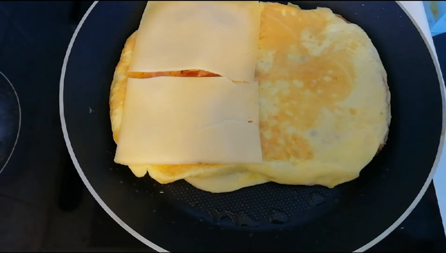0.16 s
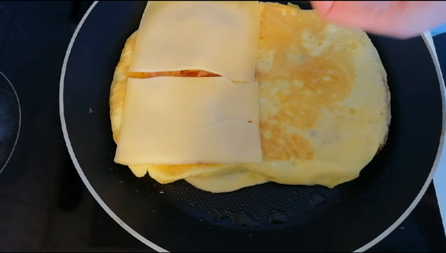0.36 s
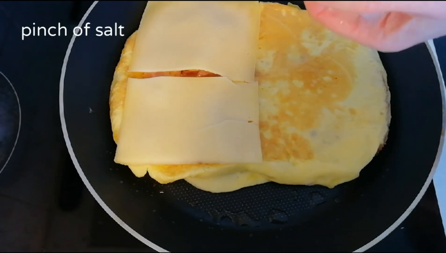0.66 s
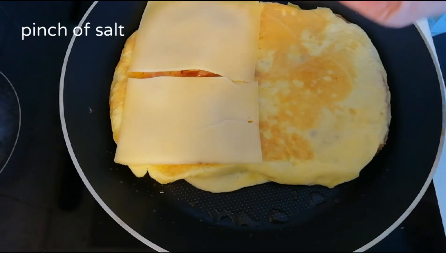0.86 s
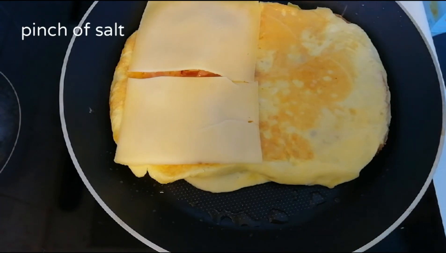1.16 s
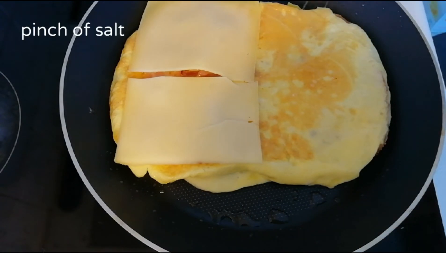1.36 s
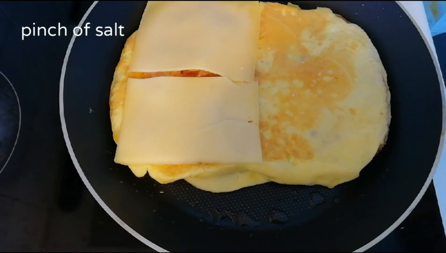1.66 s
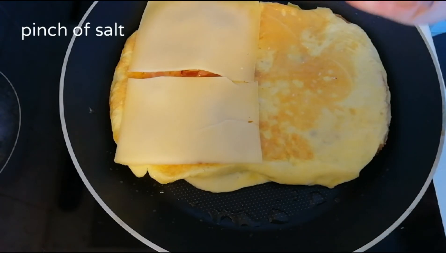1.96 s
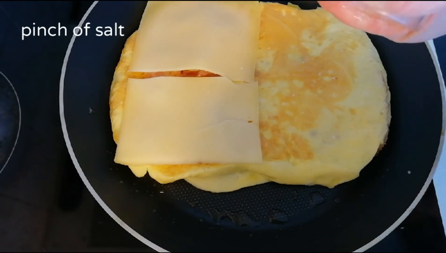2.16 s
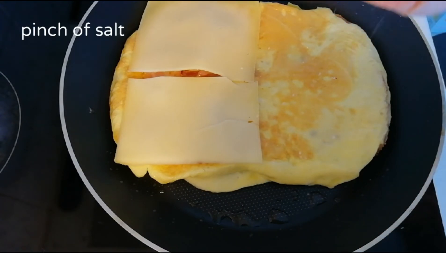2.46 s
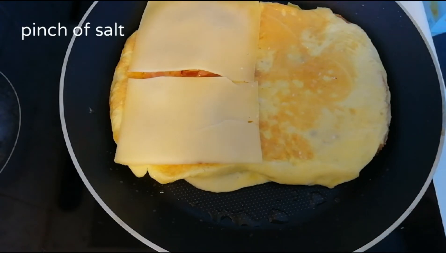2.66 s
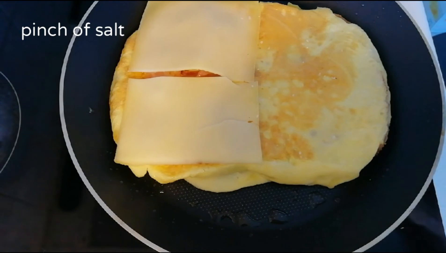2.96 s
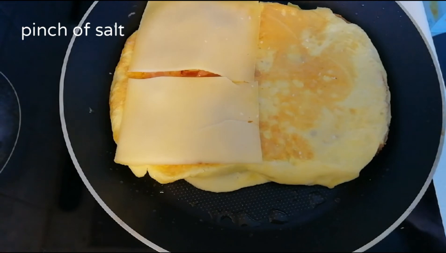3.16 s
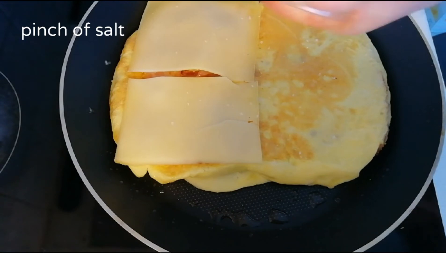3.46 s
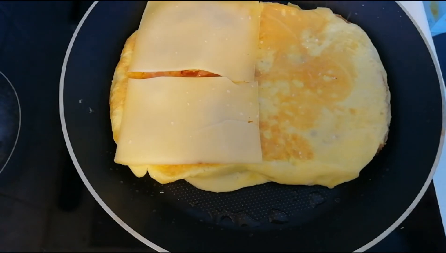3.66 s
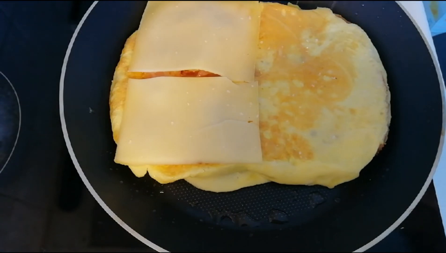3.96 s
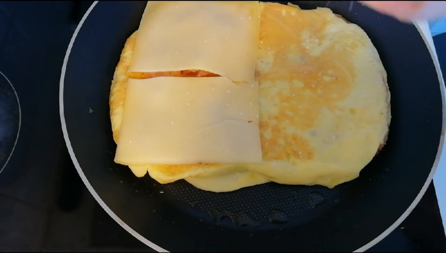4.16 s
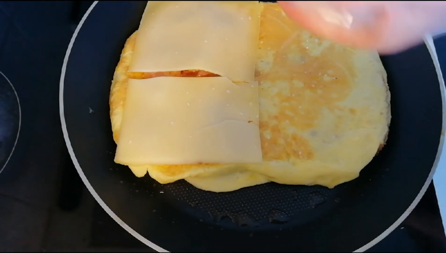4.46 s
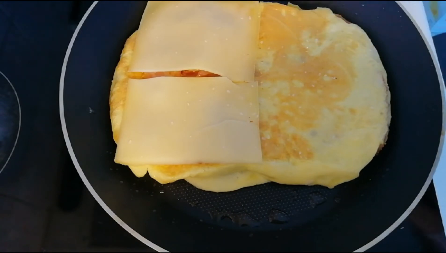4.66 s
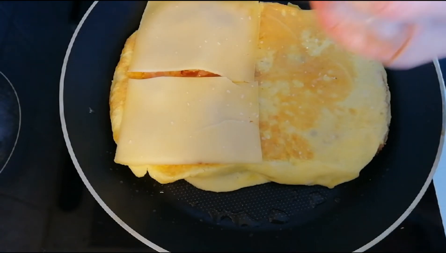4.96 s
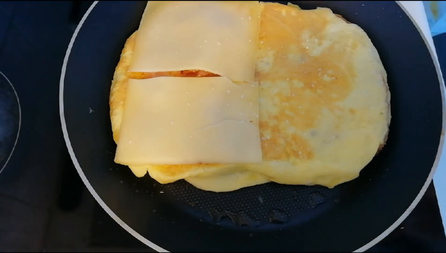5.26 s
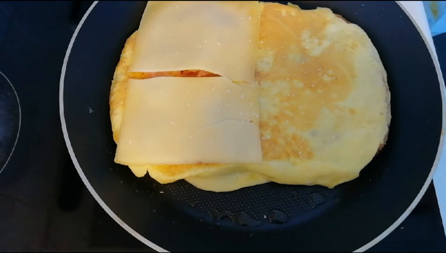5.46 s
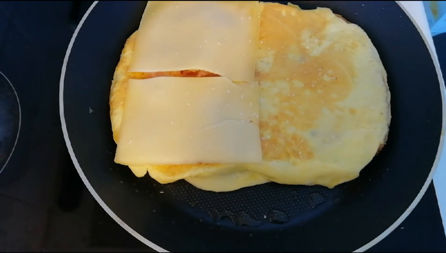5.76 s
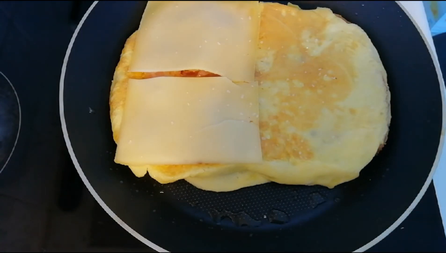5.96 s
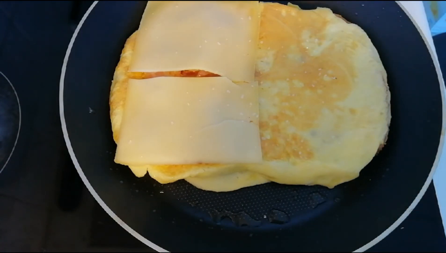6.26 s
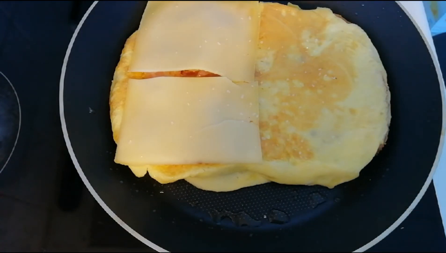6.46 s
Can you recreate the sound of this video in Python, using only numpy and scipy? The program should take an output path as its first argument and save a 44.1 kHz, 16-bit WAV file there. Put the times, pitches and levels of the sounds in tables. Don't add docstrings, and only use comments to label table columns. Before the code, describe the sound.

A salt mill is tilted with a tiny rustle of grains, scrapes softly, then grinds for about four seconds in uneven clusters of sharp, bright crystal cracks with gritty scraping and small hollow knocks. Grinding stops, a few stray ticks follow, and the mill is put down with a dull thud. Very faint sizzle and low hum lie underneath. Close microphone, small kitchen with a short reverberation.

```python
import sys
import numpy as np
from scipy import signal
from scipy.fft import rfft, irfft
from scipy.io import wavfile
from scipy.ndimage import uniform_filter1d

SR = 44100
rng = np.random.default_rng(int(sys.argv[2]) if len(sys.argv) > 2 else 0)


def inscribe(sig):
    pcm = np.round(np.clip(np.atleast_2d(sig).T, -1, 1) * 32767)
    wavfile.write(sys.argv[1], SR, pcm.astype(np.int16))


def boost(x):
    u = np.asarray(x, float) / 20
    return 10 ** u


N = 292150

# start_s, snap_db, upper_burr_db, lower_burr_db
CRACKS = [(0.966, -4, -20, -26), (0.9923, -10.5, -22, -18), (1.0117, -11.5, -13, -17),
          (1.2507, -5, -17.5, -20.5), (1.4059, -24, 2, -15), (1.4186, -10.5, -13, -15.5),
          (1.682, -14.5, -8, -19.5), (1.8123, -8.5, -10, -24), (1.9725, -11.5, -23, -18),
          (1.993, -14, -13, -24.5), (2.0071, -11.5, -21, -21), (2.1235, -7.5, -12.5, -18),
          (2.1835, -11.5, -11, -23), (2.4733, -12.5, -12, -16.5), (2.7474, -5.5, -24, -33),
          (2.7644, -6.5, -22, -16.5), (2.7805, -8, -18, -22), (2.7928, -10.5, -6.5, -16),
          (2.9213, -9.5, -29, -17.5), (3.0563, -12.5, -19, -16), (3.3487, -7.5, -26, -23.5),
          (3.356, -17, -10, -13), (3.5009, -7.5, -15.5, -25), (3.8883, -5.5, -22, -21),
          (4.0529, -5.5, -26.5, -20.5), (4.4447, -7, -13, -16), (4.4727, -17, -3, -21),
          (4.574, -13.5, -11, -21.5), (4.608, -11, -30, -24.5), (4.9436, -4.5, -20, -28.5)]
# start_s, snap_db, upper_burr_db, lower_burr_db
LESSER_CRACKS = [(1.0047, -20.5, -5, -11.5), (1.053, -17.5, -8, -18), (1.3944, -7, -20.5, -28),
                 (1.4246, -15, -1.5, -15.5), (1.4359, -21.5, -9, -16), (1.6521, -22, -10, -10.5),
                 (1.8324, -15.5, -12, -24.5), (1.9615, -16, -19, -23.5), (1.9806, -13, -21, -19.5),
                 (2.1938, -10.5, -18, -20), (2.206, -21, -9, -10.5), (2.4592, -22, -5.5, -9.5),
                 (2.616, -21.5, -9.5, -14.5), (2.6482, -14.5, -11, -17), (3.044, -9.5, -20, -31),
                 (3.0504, -24, -1.5, -32), (3.0838, -21, -15, -13), (3.18, -13, -7, -20.5),
                 (3.3868, -15, -18, -21.5), (3.4705, -24.5, 1, -18), (3.6012, -17, -8, -17),
                 (3.6147, -15, -11, -20), (3.7812, -15.5, -19, -16), (4.0224, -19, -4.5, -15.5),
                 (4.068, -17, -19, -33), (4.1533, -24, -7.5, -16), (4.1958, -19, -18, -22), (4.338, -18, -4, -21),
                 (4.463, -11.5, -15, -13.5), (4.949, -22, -3, -12.5)]
# start_s, snap_db, both_burrs_db
CRUMBS = [(0.9486, -24, -14.5), (0.9823, -16, -9), (1.0645, -21, -6.5), (1.366, -19.5, -27),
          (1.6157, -26, -8.5), (1.7983, -22, -2), (2.0207, -22, -37), (2.1415, -21, -10.5),
          (2.1565, -22, -2.5), (2.1764, -19, -10), (2.632, -21, -11), (2.9111, -17, -22),
          (3.0236, -18.5, -13.5), (3.0689, -16, -18.5), (3.398, -35, -16), (3.488, -15.5, -16),
          (3.6242, -13, -22), (3.7963, -25, -11), (3.9083, -28, -9.5), (3.9908, -35, -12),
          (4.16, -17.5, -13), (4.3233, -29, -8), (4.3457, -18, -13.5), (4.418, -22, -16.5),
          (4.4367, -25.5, -1), (4.589, -25.5, -12), (4.8164, -26, -6.5), (4.8456, -32, -4.5),
          (4.9652, -30, -24), (4.9823, -27, -30)]
# centre_hz, width_hz, level_db
LOWER_BURR = [(1700, 37, -65), (2680, 110, -1)]
# centre_hz, width_hz, level_db
AIR_COLUMN = [(1860, 260, 1), (3720, 180, 0), (5620, 280, 1)]


def evened(x):
    return x / np.sqrt(np.mean(x ** 2) + 1e-20)


def read(points, hz):
    f, value = np.transpose(points)
    return np.interp(np.log(hz + 1), np.log(f + 1), value)


def colour(x, points):
    gain_db = np.maximum(read(points, abs(np.fft.fftfreq(4096, 1 / SR))), -100)
    log_gain = np.log(boost(gain_db))
    taps = np.fft.ifft(np.exp(np.conj(signal.hilbert(log_gain)))).real[:2048]
    return signal.oaconvolve(x, taps)[:len(x)]


def band(x, lo_hz, hi_hz):
    edges_hz = [lo_hz, min(hi_hz, SR / 2 - 100)]
    return signal.sosfilt(signal.butter(2, edges_hz, "bandpass", fs=SR, output="sos"), x)


def ring(x, modes):
    return sum(boost(db) * signal.lfilter(*signal.iirpeak(hz, hz / width, SR), x) for hz, width, db in modes)


def add(mix, s, sound):
    part = mix[round(s * SR):][:len(sound)]
    part += sound[:len(part)]


def grains(per_s, spread_db):
    size = boost(spread_db * np.minimum(rng.exponential(1, N), 5)) * rng.standard_normal(N)
    return evened(size * (rng.random(N) < per_s / SR))


def hum():
    # pitch_hz, level_db
    spectrum = [(12, -8.5), (20, -16.5), (65, 1.5), (144, 1), (188, -15), (242, -15), (275, -6.5),
                (393, -27), (427, -24), (549, -37), (677, -32), (1440, -35.5), (1600, -35), (1700, -36.5),
                (3000, -40.5), (3900, -67), (6600, -120)]
    swell_db = 1.0 * evened(uniform_filter1d(rng.standard_normal(N), 5000))
    shape = boost(read(spectrum, np.fft.rfftfreq(N, 1 / SR)))
    rumble = irfft(rfft(rng.standard_normal(N)) * shape, N)
    return boost(-52 + swell_db) * evened(rumble)


def kitchen(x):
    # pitch_hz, t60_s
    decay = [(300, 0.16), (790, 0.27), (2090, 0.32), (5510, 0.36), (9000, 0.33), (14600, 0.15)]
    out, t = np.zeros(N), np.arange(N) / SR
    for k in range(3):
        taps = np.zeros(SR // 2)
        at = np.arange(80, SR // 2 - 20, 20)
        taps[at + rng.integers(0, 20, len(at))] = rng.choice([-1., 1.], len(at))
        hz, when, z = signal.stft(taps, SR, nperseg=256)
        fading = boost(-60 * when / read(decay, hz)[:, None])
        tail = signal.istft(z * fading, SR, nperseg=256)[1]
        share = np.sqrt(2 / 3) * np.cos(2 * np.pi * (7 * t + k / 3))
        out += signal.oaconvolve(x * share, tail / np.linalg.norm(tail))[:N]
    return out


def sizzle():
    # pitch_hz, level_db
    spectrum = [(1500, -7), (3000, -2), (6000, 0.5), (9000, 2.5), (12000, 4), (16000, 3)]
    swell_db = .7 * evened(uniform_filter1d(rng.standard_normal(N), 4000))
    fizz = grains(5000, 5.8) + boost(2.5) * rng.standard_normal(N)
    return boost(-64.0 + swell_db) * evened(colour(fizz, spectrum))


def set_down():
    # start_s, level_db
    contacts = [
        (6.0894, -19),
        (6.101, -49),
        (6.122, -45),
    ]
    # pitch_hz, level_db, t60_s
    worktop = [(223.3, 0.5, 0.33), (384, -5, 0.45), (490, 9.5, 0.12), (590, -7.5, 1.3), (815, -4, 0.45),
               (938, -5, 0.77), (1124, 0, 0.097), (1360, -28, 0.064), (1700, -22, 1.3), (1840, -27, 0.47),
               (3400, -42, 0.25), (4160, -38, 0.93)]
    # pitch_hz, level_db
    thud = [(100, -13), (250, -4.5), (600, -7.5), (1100, -4.5), (1750, -10.5), (2000, -19.5), (4000, -35),
            (9000, -48.5), (15000, -60)]
    t, blows = np.arange(SR // 2) / SR, np.zeros(N)
    for s, db in contacts:
        blows[round(s * SR)] = boost(db)
    slab = sum(boost(db - 60 * t / min(t60, .4) - 14.0) * np.sin(2 * np.pi * hz * t) for hz, db, t60 in worktop)
    rattle = colour(rng.standard_normal(len(t)) * boost(-60 * t / 0.39), thud)
    boom = boost(-18.0 - 60 * t / 1.2) * (1 - np.exp(-t / 0.093)) * np.sin(2 * np.pi * 108 * t)
    contact_rise = 1 - np.exp(-t / 0.00024)
    response = (slab + boom + boost(8.5) * rattle) * contact_rise
    return signal.oaconvolve(blows, response)[:N]


def rustle():
    # centre_s, half_length_s, level_db
    slides = [
        (0.448, 0.034, -51),
        (5.455, 0.041, -64),
    ]
    t = np.arange(N) / SR
    swell = sum(boost(db) * np.exp(-.5 * ((t - s) / half) ** 2) for s, half, db in slides)
    slide = swell * grains(9000, 2.2)
    return band(slide, 3400, 15000) + ring(slide, [(3040, 480, 1.7), (5900, 140, 2.3)])


def grit():
    # start_s, level_db
    pressure = [(0.25, -56), (0.35, -52.5), (0.422, -55), (0.6, -69), (0.85, -84), (0.95, -53),
                (1.37, -47.5), (1.7, -43), (2.3, -42.5), (2.391, -50), (2.55, -50.5), (3.5, -57),
                (3.85, -49), (4.18, -52), (4.5, -42), (4.75, -68), (5.1, -54.5), (5.6, -70)]
    spill_db, spill_s = -26.5, 0.033
    load_db, load_s = -4.5, 0.0067
    t, spills = np.arange(N) / SR, np.zeros(N)
    for s, db, *_ in CRACKS + LESSER_CRACKS:
        spills[round(s * SR)] = boost(db + spill_db)
    s, db = np.transpose(pressure)
    level = boost(np.interp(t, s, db, -120, -120))
    level += signal.lfilter([1], [1, -np.exp(-1 / (spill_s * SR))], spills)
    level += boost(load_db) * signal.lfilter([1], [1, -np.exp(-1 / (load_s * SR))], spills[::-1])[::-1]
    ticks = level * grains(5000, 2.5)
    return boost(-13.5) * band(ticks, 870, 27000) + boost(-48.5) * ring(ticks, AIR_COLUMN + LOWER_BURR)


def knocks():
    # start_s, level_db
    slips = [(0.967, -37), (1.005, -34.5), (1.054, -42.5), (1.251, -38.5), (1.397, -43), (1.418, -39),
             (1.62, -45), (1.812, -40), (1.984, -42.5), (2.19, -40), (2.47, -44.5), (2.615, -44),
             (2.778, -37.5), (2.919, -44), (3.358, -52), (3.614, -49), (3.781, -40.5), (3.892, -33.5),
             (4.053, -43.5), (4.339, -47), (4.446, -38.5), (4.59, -52), (4.816, -46)]
    return [(s, db - 40, 0, 0, 40 - 3) for s, db in slips]


def chips(count):
    pause_s, lead_s = .07, .06
    chip_db, rise_db, spread_db = -42, 14.5, 4.5
    # upper_burr_db, lower_burr_db, shell_db
    parts_db = [-11, -9, -23.5]
    s = np.sort([row[0] for row in CRACKS + LESSER_CRACKS + CRUMBS])
    starts = s[np.diff(s, prepend=0) > pause_s]
    early, *odd = rng.random((len(starts), count, 5)).T
    early = (np.arange(count)[:, None] + .2 + .8 * early) / count
    db = chip_db - rise_db * early
    parts = [mean + spread_db * 3.5 * (u - .5) for mean, u in zip([db] + parts_db, odd)]
    return [tuple(row) for row in np.reshape([starts - lead_s * early] + parts, (5, -1)).T]


def breaks():
    snap_db, shell_db, onset_s = -7.0, -41, .0006
    big = [(s, db, up + 6.5, low + 8.5) for s, db, up, low in CRACKS + LESSER_CRACKS]
    small = [(s, db, both + 0, both + 3.5) for s, db, both in CRUMBS]
    return [(s + onset_s, db + snap_db, up, low, shell_db) for s, db, up, low in big + small]


def mill(snap, upper, lower, knock):
    # centre_hz, width_hz, level_db
    upper_burr = [(3820, 38, -0.5), (4280, 124, -12.5), (5690, 140, -9)]
    # centre_hz, width_hz, level_db
    shell = [(433.4, 62, 1), (750, 25, -19)]
    top = boost(7.5) * band(snap, 7540, 15150)
    high = boost(11.5) * band(upper, 4130, 6650) + boost(18.5) * ring(upper, upper_burr)
    low = boost(17.5) * band(lower, 1593, 3174) + boost(12.5) * ring(lower, LOWER_BURR)
    body = boost(36.5) * ring(knock, shell) + boost(19.0) * band(knock, 383, 1110)
    return top - high + low + body


def cracks(rows, gain_db, splinter_s, splinter_db):
    t = np.arange(-60, 800) / SR
    give = boost(-8.0) * np.exp(np.minimum(t, 0) / .0003)
    lasting = splinter_s * np.array([[1], [.8], [.8], [.8]])
    shape = boost(splinter_db) * np.where(t < 0, give, np.exp(-t / lasting))
    far = boost(np.array([-0.3, -3.5, -1.0, 8.0]))
    near, jolts = np.zeros((2, 4, N))
    draws = rng.standard_normal((len(rows), 2, 860))
    for (s, db, *parts_db), (noise, lumps) in zip(rows, draws):
        burst = shape * noise * boost(2.5 * evened(uniform_filter1d(lumps, size=25)))
        burst *= np.linalg.norm(shape[0]) / np.linalg.norm(burst[0])
        burst[:, 60] += 1.15 * np.sign(noise[60])
        level = boost(gain_db + db + np.array([0] + parts_db))
        lag, echo_sign = 4 + int(abs(lumps[0]) * 9), np.sign(lumps[1])
        burst += .6 * echo_sign * np.roll(burst, lag, axis=1)
        for k in range(4):
            add(near[k], s + t[0], 0.85 * level[k] * burst[k])
        jolts[:, round(s * SR)] += 0.9 * level * far
        jolts[:, round(s * SR) + lag] += .5 * echo_sign * level * far
    return np.array([mill(*near), mill(*jolts)])


def scene():
    # start_s, snap_db, upper_burr_db,
    # lower_burr_db, shell_db
    spits = [(0.223, -59, -19, -20, -24), (0.3072, -40, -29, -18, -36), (0.4173, -44, -14, -25, -30),
             (1.3928, -21.5, -12, -5, -27), (1.8165, -12, -32, -11.5, -39), (1.9355, -42, 3, 2, -15),
             (3.743, -45, 5, 3, -8), (4.9088, -43.5, -16, -8, -14), (0.9105, -42.5, -16, -6, -30),
             (5.1198, -41.5, -31.5, -31, -45), (5.1835, -53.5, -15, -23, -11), (5.3012, -39, -13, -9, -17),
             (5.3649, -36.5, -19, -10, -51), (5.705, -45.5, -10, -28, -43), (6.316, -66, -15, -17, -9),
             (6.3875, -66.5, -19, -21, -20)]
    fractures = cracks(breaks() + knocks() + chips(count=2), 0.33, 0.0055, -11.5)
    near, jolts = fractures + cracks(spits, -1.0, 0.0028, -8.5)
    scrape = grit() + rustle()
    sent = boost(0.53) * jolts + boost(-8.5) * scrape
    room = kitchen(sent + ring(sent, AIR_COLUMN))
    return (near + scrape + room + set_down() + sizzle() + hum())[None]


def gate(x, shut_db, open_db, depth_db):
    treble = band(x, 1700, 20000)
    power_db = 10 * np.log10(abs(uniform_filter1d(treble ** 2, size=900)) + 1e-12)
    cut_db = depth_db * np.clip((open_db - power_db) / (open_db - shut_db), 0, 1)
    return x - treble * (1 - boost(-cut_db))


def top_cut(x):
    return signal.sosfilt(signal.butter(12, 16810, fs=SR, output="sos"), x)


def record(dry):
    # pitch_hz, level_db
    port = [(20, -7.5), (5000, 4.5), (5650, 4.5), (6100, 4.5), (7600, 7), (8600, 15.5), (9000, 15.5),
            (9900, 5.5), (10800, -2.5), (13000, -6), (15600, -8), (15900, -21), (16600, -22), (16800, -76)]
    rounded = np.tanh(colour(dry[0], port))
    gated = gate(rounded, -59.0, -42.5, 2.7)
    low_pass = signal.firwin(401, 16600, window=("kaiser", 9), fs=SR)
    cut = signal.oaconvolve(gated, low_pass, "same")
    return top_cut(cut[None])


dry = scene()
out = record(dry)
inscribe(out)
```